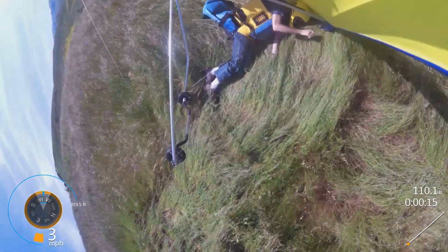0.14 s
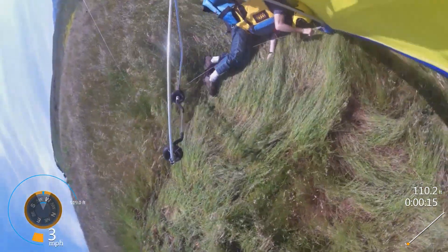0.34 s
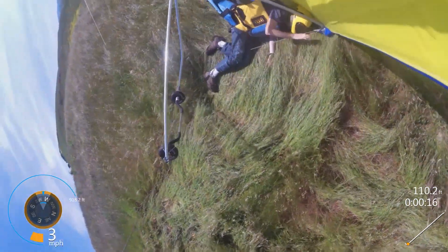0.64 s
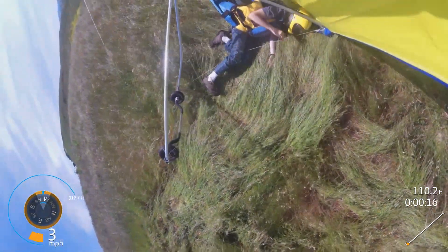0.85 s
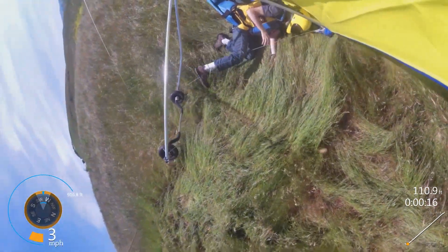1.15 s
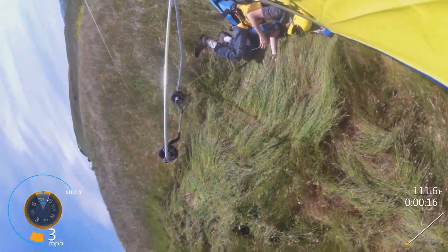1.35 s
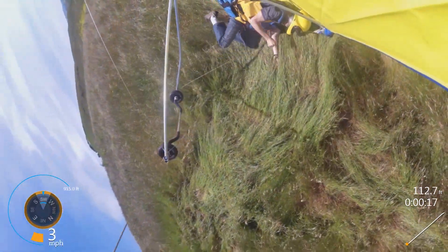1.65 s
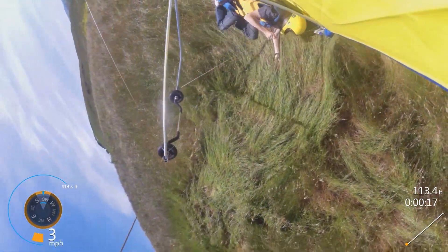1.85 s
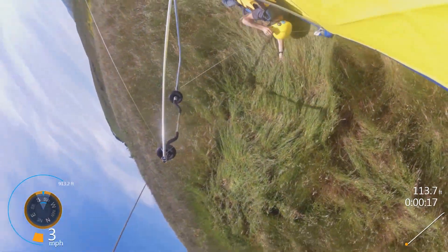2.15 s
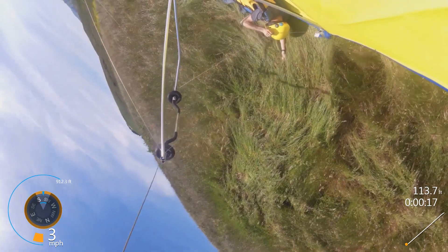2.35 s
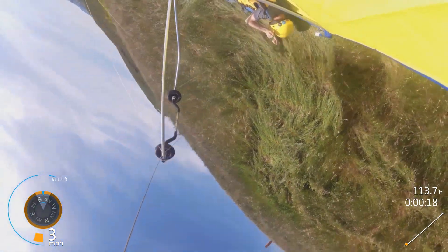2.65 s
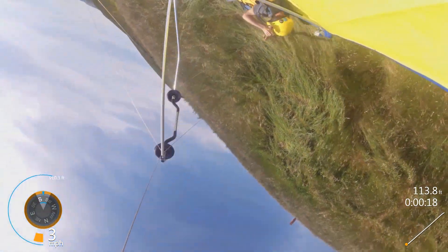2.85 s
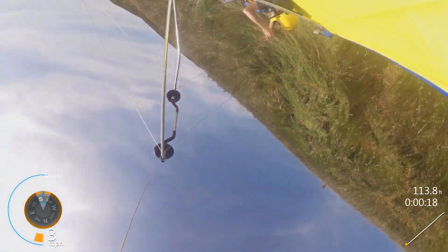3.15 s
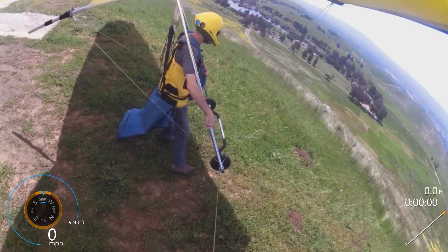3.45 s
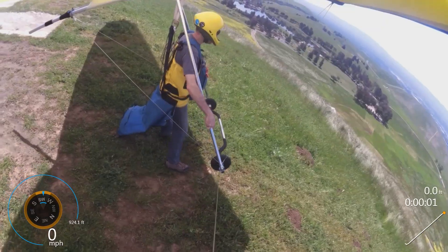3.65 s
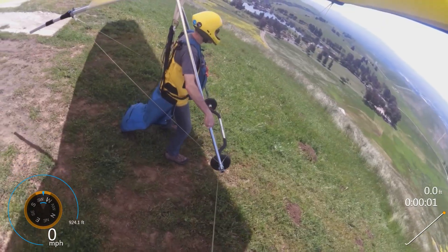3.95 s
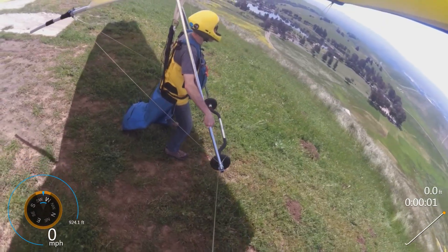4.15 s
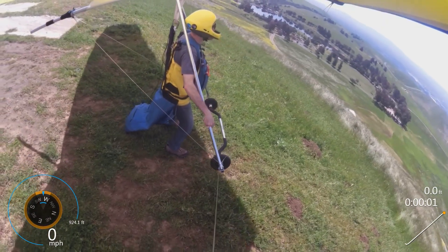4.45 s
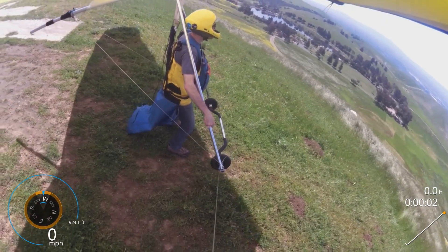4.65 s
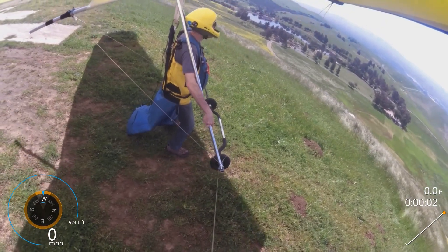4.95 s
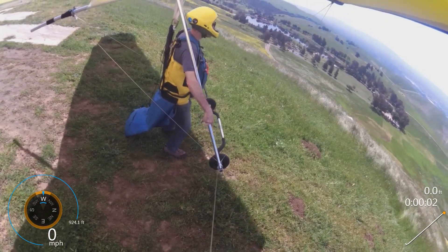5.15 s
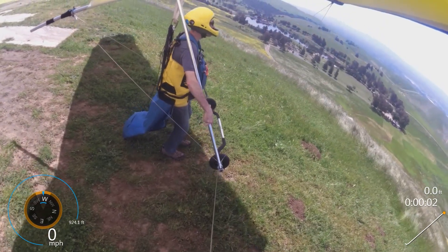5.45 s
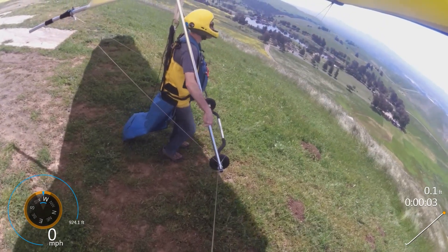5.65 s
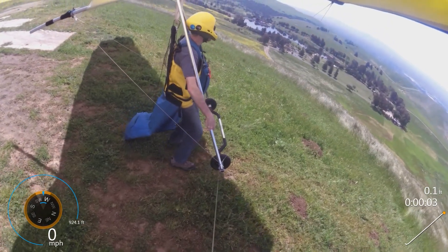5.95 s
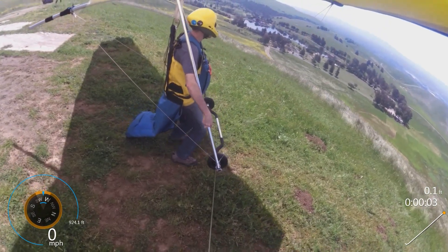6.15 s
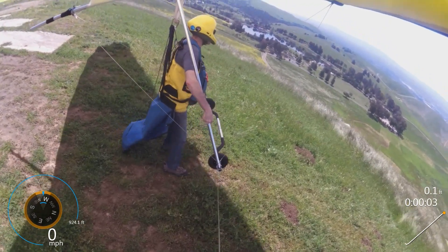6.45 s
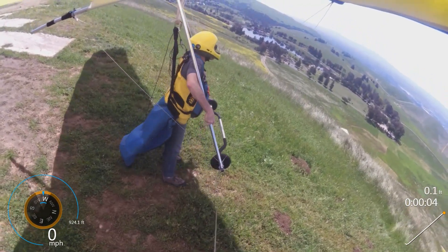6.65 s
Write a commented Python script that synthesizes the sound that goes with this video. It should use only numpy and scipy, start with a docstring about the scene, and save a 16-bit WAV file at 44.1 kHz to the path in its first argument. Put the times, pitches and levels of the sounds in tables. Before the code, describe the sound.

A camera on a toppled hang glider thumps and scrapes harshly through long grass, quiets, judders, then cuts to a calm hillside ended by a metallic clank.

```python
"""A tipped-over hang glider drags its wing camera through long grass: decaying swings thump the housing, ringing
flicks snap at it, random slips scrape along it, and the microphone clips. Light wind, shaped noise, blows throughout.
Frame knocks, rubbed notes and a pattering of stems follow, then a judder before the sound jumps to the glider
standing on a quiet hillside: harness rubbing, knocks, and a faint cricket, a tone gated into chirps.
Late on, as it is lifted, a bouncing metal blow sets the tube modes ringing in one clank."""
import sys
import numpy as np
from scipy import signal
from scipy.fft import rfft, irfft
from scipy.io import wavfile

SR = 44100
rng = np.random.default_rng(int(sys.argv[2]) if len(sys.argv) > 2 else 0)


def dump(signal):
    """Clip the signal to [-1, 1] and save it as 16-bit WAV at the path in sys.argv[1]."""
    limited = np.clip(np.atleast_2d(signal).T, -1, 1)
    pcm = np.round(limited * 32767).astype(np.int16)
    wavfile.write(sys.argv[1], SR, pcm)


N = 300040
TIME = np.arange(N) / SR


def amp(db):
    """Logarithmic level: decibels to amplitude gain."""
    return 10 ** (np.asarray(db) / 20)


def evened(x):
    """Power normalisation: scales to unit mean square."""
    return x / np.sqrt(np.mean(x ** 2) + 1e-20)


def peaked(x):
    """Peak normalisation: scales to unit peak."""
    return x / (abs(x).max() + 1e-20)


def add(mix, s, sound):
    """Superposition: adds a sound into the mix, in place, at time s."""
    part = mix[max(round(s * SR), 0):][:len(sound)]
    part += sound[:len(part)]


def colour(x, points, size=4096):
    """Minimum-phase filtering: the Hilbert transform of the log gain gives a causal response."""
    hz, db = np.transpose(points)
    bin_hz = abs(np.fft.fftfreq(size, 1 / SR))
    gain_db = np.interp(np.log(bin_hz + 1), np.log(hz), db)
    spectrum = np.exp(np.conj(signal.hilbert(np.log(amp(gain_db)))))
    response = np.fft.ifft(spectrum).real
    return signal.fftconvolve(x, response[:size // 2])[:len(x)]


def hiss(points, size):
    """Spectral shaping: white noise coloured and set to unit power."""
    return evened(colour(rng.standard_normal(size), points))


def wander(rate_hz):
    """Band-limited random fluctuation: low-passed noise of unit spread."""
    lowpass = 1 / (1 + (np.fft.rfftfreq(N, 1 / SR) / rate_hz) ** 4)
    return evened(irfft(rfft(rng.standard_normal(N)) * lowpass, N))


def fade(t, t60):
    """Exponential damping: falls by 60 dB in t60 seconds."""
    return np.exp(-np.log(1000) * t / max(t60, 1e-3))


def ring(modes, t, spread_db):
    """Modal superposition: a random striking point gives each damped mode its own share and sign."""
    total = 0
    for hz, db, t60 in modes:
        share = rng.choice([-1, 1]) * amp(db + spread_db * rng.standard_normal())
        total = total + share * fade(t, t60) * np.sin(2 * np.pi * hz * t)
    return total


def grains(grains_per_s, grain_db):
    """Random impulse train: sparse grains of either sign and uneven strength, capped at 4 * grain_db."""
    sizes = rng.choice([-1, 1], N) * amp(grain_db * np.minimum(rng.exponential(1, N), 4))
    return (rng.random(N) < grains_per_s / SR) * sizes


# heavy blows on the housing: [t/s, relative level/dB, nominal f/Hz]
BLOWS = [(0.0, 2.5, 88), (.028, 9, 164.8), (.037, 5.5, 156.5), (.088, -9, 353), (.109, -0.5, 217),
         (.188, -10.5, 366), (.207, -10.5, 210), (.3, 2.5, 139), (.437, -3.5, 242), (.45, 2, 178),
         (.473, 12, 136), (.497, 7.5, 154), (.52, -5, 196), (.549, -9.5, 460), (.585, -9, 220),
         (.605, -5.5, 215), (.627, -0.5, 216), (1.09, -19, 122), (1.605, -19, 160), (2.207, -20, 153),
         (3.252, -0.5, 420), (3.255, 3.5, 123), (3.326, 1, 168.7), (6.154, -12, 440), (6.17, -15, 167),
         (6.267, -3.5, 432), (6.28, -0.5, 171)]
# scraping spectrum, also the crunch within a blow: [f/Hz, relative level/dB per Hz]
SCRAPE_SPECTRUM = [(100, -8.5), (300, 10), (600, 6), (1000, 4), (1500, -2), (1900, -12.5), (2230, -4.5),
                   (2600, -16), (3300, -25), (4900, -30.5), (7000, -44.5)]
SWELL_CYCLES = 0.48  # rise of a blow, in cycles of its nominal frequency


def thumps(rows, sag=0.45, crunch_db=-24, level_db=-1, size=6000):
    """Falling contact stiffness: each shove makes a few heavy swings that slow as the contact loosens."""
    out, t = np.zeros(N), np.arange(size) / SR
    for s, db, hz in rows:
        u = t * hz / SWELL_CYCLES
        push = (u * np.exp(1 - u)) ** 2
        pitch = hz * (1 + sag * (2 * np.exp(-u / 2) - 1))
        swing = np.sin(2 * np.pi * np.cumsum(pitch) / SR)
        crunch = amp(crunch_db) * hiss(SCRAPE_SPECTRUM, size)
        add(out, s, amp(db + level_db) * push * (swing + crunch))
    return out


# stems crushed under a blow: [f/Hz, relative level/dB per Hz]
CRUSH_SPECTRUM = [(200, -15), (900, 5.5), (2300, -5.5), (4500, -25), (7000, -25), (14000, -25.5)]


def crush(shoves, level_db=-21, follow_hz=60, give=1.0, grains_per_s=2500, grain_db=4):
    """Force-modulated crackle: stems crackle as hard as the blows press, up to where they give way."""
    pressed = np.minimum(abs(shoves), give)
    force = signal.lfilter(*signal.butter(1, follow_hz, fs=SR), pressed)
    crackle = evened(colour(grains(grains_per_s, grain_db), CRUSH_SPECTRUM))
    return amp(level_db) * force * crackle


# bass of the rubbing: [f/Hz, relative level/dB per Hz]
WEIGHT_SPECTRUM = [(20, -31), (45, -15.5), (75, -2.5), (120, -5), (170, 3), (230, -2), (300, -9),
                   (500, -11.5), (900, -22), (2000, -64)]
# low modes of the frame, rung by rubs and knocks: [f/Hz, relative level/dB, T60/s]
FRAME_MODES = [(155.8, -5, 0.21), (211.8, -2, 0.14), (217.4, -1.5, 0.12), (254.6, -0.5, 0.088),
               (323.4, -1.5, 0.11), (410, -6, 0.13), (468, -7, 0.066), (625, -10, 0.094)]
# modes of the camera's housing and mount, rung likewise: [f/Hz, relative level/dB, T60/s]
CASE_MODES = [(851, 3.5, 0.21), (1206, 5.5, 0.033), (1236, -14.5, 0.089), (1480, -1, 0.14),
              (1596, -2.5, 0.066), (1704, -2.5, 0.05), (2118, -3.5, 0.11), (2228, 3, 0.045),
              (2670, -13, .03), (3420, -13, 0.011), (4320, -16.5, 0.05), (4850, -22, 0.025)]


def rubbing(curve, weight_db, scrape_db, grains_per_s, grain_db, lumpy_db, ring_db, case_db, size=9000):
    """Frictional excitation: countless tiny slips, in clumps, set the frame and the housing ringing."""
    s, weight, scrape = np.transpose(curve)
    t = np.arange(size) / SR
    clumps = amp(lumpy_db * wander(rate_hz=14))
    slips = evened(grains(grains_per_s, grain_db) * clumps)
    frame = evened(signal.fftconvolve(slips, ring(FRAME_MODES, t, spread_db=2.5))[:N])
    case = evened(signal.fftconvolve(slips, ring(CASE_MODES, t, spread_db=2.5))[:N])
    bass = evened(colour(slips + rng.standard_normal(N), WEIGHT_SPECTRUM))
    low = evened(bass + amp(ring_db) * frame)
    high = evened(colour(slips, SCRAPE_SPECTRUM)) + amp(case_db) * case
    low_gain = amp(np.interp(TIME, s, weight) + weight_db)
    high_gain = amp(np.interp(TIME, s, scrape) + scrape_db)
    return low_gain * low + high_gain * high


# rubbing of grass: [t/s, relative bass level/dB, relative treble level/dB]
DRAG_LEVELS = [(0.0, -25.5, -39.5), (.23, -27.5, -36), (.5, -22, -39.5), (.62, -31, -52.5),
               (.85, -35.5, -54), (1.44, -44, -58.5), (1.85, -41.5, -55.5), (2.25, -32.5, -42),
               (2.45, -35.5, -48), (2.7, -37.5, -50), (2.8, -29, -46), (2.94, -26.5, -38.5),
               (3.03, -39.5, -50), (3.22, -31.5, -42), (3.35, -26.5, -46.5)]


def grass():
    """Sliding friction: grass drags along the housing."""
    return rubbing(DRAG_LEVELS, weight_db=0.0, scrape_db=2.5, grains_per_s=3500, grain_db=3,
                   lumpy_db=3.0, ring_db=-6.0, case_db=-13.5)


# light air: [f/Hz, relative level/dB per Hz]
AIR_SPECTRUM = [(25, -26.5), (70, -17), (200, -0.5), (400, -8), (650, -12.5), (1000, -10), (2000, -18),
                (3500, -23.5), (5000, -32), (8000, -23.5)]


def wind(level_db=-62):
    """Turbulence noise: light air as shaped noise under slow, slight gusts."""
    gusts_db = .7 * wander(rate_hz=4)
    return amp(level_db + gusts_db) * hiss(AIR_SPECTRUM, N)


# stiff stalks and wires flicking the housing: [t/s, peak level/dB, f/Hz]
STALK_FLICKS = [(.065, -19, 1360), (.201, -16, 990), (.294, -15.5, 1040), (.295, -21, 3900),
                (.45, -10, 1450), (.487, -16.5, 3540), (.551, -8.5, 1160), (.63, -29.5, 1335),
                (1.308, -39, 540), (1.866, -29, 605), (2.214, -35, 3600), (2.281, -30, 860),
                (3.249, -4, 3955), (3.325, -25.5, 3500), (3.739, -45, 3706), (5.635, -45, 4200),
                (6.155, -22.5, 833), (6.411, -26, 874)]
# sharp crack of a flick or a metal blow: [f/Hz, relative level/dB per Hz]
CRACK_SPECTRUM = [(60, -21), (400, 8.5), (1000, 14.5), (1600, 7.5), (3000, -6), (4800, -29), (8000, -28.5),
                  (14000, -34.5)]


def flicks(rows, ring_cycles, crack, size=4000):
    """Constant-cycle damping: a crack and a very short ring, the shorter the higher it is."""
    out, t = np.zeros(N), np.arange(size) / SR
    for s, db, hz in rows:
        t60 = ring_cycles / hz
        tone = np.sin(2 * np.pi * hz * t) * fade(t, t60)
        snap = tone + crack * hiss(CRACK_SPECTRUM, size) * fade(t, min(t60, .025))
        add(out, s, amp(db) * peaked(snap))
    return out


TUFT_S, TUFT_LENGTH_S = .45, .088
TUFT_DB, TUFT_HZ = -2, 380  # centre of the scatter


def tuft(count=4):
    """Random impact sequence: a thick tuft's quick light blows; rows of t/s, relative level/dB, f/Hz."""
    late, scatter_db, detune = (rng.uniform(-1, 1, (count, 3)) * [.3, 2, .15]).T
    s = TUFT_S + TUFT_LENGTH_S * (np.arange(count) + .5 + late) / count
    return list(zip(s, TUFT_DB + scatter_db, TUFT_HZ * (1 + detune)))


# knocks carried by the frame: [t/s, relative level/dB, relative treble level/dB]
FRAME_KNOCKS = [(.76, -22.5, -16), (1.091, -28, -20), (1.601, -28.5, -16.5), (1.756, -36, -4),
                (1.867, -24, -11.5), (1.885, -24.5, -14), (2.025, -30.5, -4.5), (2.331, -27.5, -5),
                (3.392, -35.5, -4), (3.453, -31, -11.5), (3.738, -26, -22), (3.917, -37, -14),
                (4.184, -30, -14.5), (4.206, -34, -10), (4.284, -34, -22), (4.356, -31, -8.5),
                (4.754, -37.5, -7), (4.916, -34.5, -11), (5.343, -33.5, -10.5), (5.455, -28.5, -18.5),
                (5.577, -27, -19.5), (5.634, -32, -12), (5.845, -35, -10), (6.153, -14.5, -20),
                (6.411, -17.5, -23), (6.449, -19.5, -9.5), (6.558, -24.5, -16)]
# dull body of a knock: [f/Hz, relative level/dB per Hz]
BODY_SPECTRUM = [(40, -23), (140, 1.5), (250, 10), (450, 2), (900, -12.5), (1300, -17.5), (3000, -64)]
# rattling edge of a knock: [f/Hz, relative level/dB per Hz]
EDGE_SPECTRUM = [(300, -26.5), (700, 8.5), (1500, 13), (1900, -10.5), (2250, -3), (2800, -6), (4800, -14.5),
                 (5600, -45.5), (12000, -67.5)]


def knocks(rows, t60, ring_db=0, edge_db=2, edge_share=0.61, case_db=2, rise_s=0.0012, level_db=-1, size=14000):
    """Structure-borne impact: the housing ticks and rattles over a low ring of the frame."""
    out, t = np.zeros(N), np.arange(size) / SR
    for s, db, treble_db in rows:
        thud = peaked(hiss(BODY_SPECTRUM, size) * fade(t, t60))
        frame = peaked(ring(FRAME_MODES, t, spread_db=0.5))
        body = peaked((thud + amp(ring_db) * frame) * (1 - np.exp(-t / rise_s)))
        rattle = peaked(hiss(EDGE_SPECTRUM, size) * fade(t, t60 * edge_share))
        case = peaked(ring(CASE_MODES, t, spread_db=2))
        edge = peaked(rattle + amp(case_db) * case)
        add(out, s, amp(db + level_db) * peaked(body + amp(treble_db + edge_db) * edge))
    return out


# notes drawn out by stick-slip: [t/s, relative level/dB, f/Hz, length/s]
GROAN_NOTES = [(1.89, -31.5, 162, 0.49), (2.14, -36, 625, 0.1), (2.987, -24.5, 190, .09),
               (4.173, -33.5, 253, 0.073)]


def groans(waver=0.0351, shudder_db=3, level_db=-2):
    """Stick-slip oscillation: brief unsteady notes of a rubbed tube or wire."""
    out = np.zeros(N)
    speed = 1 + waver * wander(rate_hz=35.8)
    grip = amp(shudder_db * wander(rate_hz=32))
    for s, db, hz, length in GROAN_NOTES:
        swell = np.sin(np.pi * np.clip((TIME - s) / length, 0, 1))
        note = np.sin(2 * np.pi * np.cumsum(hz * speed) / SR)
        out += amp(db + level_db) * swell * grip * note
    return out


# onsets of the pattering stems: [t/s]
PATTER_ONSETS = [2.333, 2.357, 2.376, 2.414, 2.495, 2.545, 2.572]


def patter(level_db=-36, hz=2173):
    """Repeated impact: stems flick the housing at one level and pitch."""
    return flicks([(s, level_db, hz) for s in PATTER_ONSETS], ring_cycles=110, crack=0.97)


# catches of the frame juddering over the ground: [t/s]
JUDDER_ONSETS = [3.017, 3.04, 3.068, 3.095, 3.139, 3.18]


def judder(knock_db=-20, treble_db=-18.5, flick_db=-32, flick_hz=617, rise_db_per_s=37):
    """Intermittent contact: each catch is a ground-damped knock and a flick, sharper as it goes."""
    catches = [(s, rise_db_per_s * (s - JUDDER_ONSETS[0])) for s in JUDDER_ONSETS]
    dull = knocks([(s, knock_db, treble_db + rise) for s, rise in catches], t60=.11)
    sharp = flicks([(s, flick_db + rise, flick_hz) for s, rise in catches], ring_cycles=40, crack=1.2)
    return dull + sharp


# rubbing on the standing frame: [t/s, relative bass level/dB, relative treble level/dB]
STAND_LEVELS = [(3.37, -40, -54), (3.6, -45.5, -62), (4.27, -44, -74), (4.55, -56.5, -65.5),
                (5.09, -37.5, -52.5), (5.57, -42, -56), (6.2, -36, -52), (6.33, -22, -42),
                (6.46, -29, -37.5), (6.6, -30.5, -48), (6.8, -31, -49)]


def harness():
    """Sliding friction: the harness rubs on the standing frame."""
    return rubbing(STAND_LEVELS, weight_db=-7.5, scrape_db=-2.5, grains_per_s=3000, grain_db=2.5,
                   lumpy_db=4.0, ring_db=1.5, case_db=-12.5)


CRICKET_S, CHIRP_EVERY_S, CHIRP_LENGTH_S = 3.775, .215, .063


def cricket(level_db=-80, hz=4950, strokes_per_s=85):
    """Amplitude modulation: evenly paced chirps of a few wing strokes, wavering on the breeze."""
    u = (TIME - CRICKET_S) % CHIRP_EVERY_S / CHIRP_LENGTH_S
    chirps = np.sqrt(np.clip(4 * u * (1 - u), 0, 1)) * (TIME > CRICKET_S)
    strokes = 2 * np.sin(np.pi * strokes_per_s * TIME) ** 2
    breeze = amp(2 * wander(rate_hz=20))
    pitch = hz + 45 * wander(rate_hz=60)
    return amp(level_db) * chirps * strokes * breeze * np.sin(2 * np.pi * np.cumsum(pitch) / SR)


# blows of a fitting against the tubes: [t/s, relative level/dB]
CLANK_BLOWS = [(6.264, -0.5), (6.269, 3.5), (6.276, -36)]
# modes of the tubes; close groups beat: [f/Hz, relative level/dB, T60/s]
TUBE_MODES = [(323, 2, .22), (420, 3, .05), (670, 3, .06), (868, -7, .25), (888, -4, .33), (914, -2, .25),
              (1147, -6, .14), (1244, -16, .17), (1362, 3, .05), (1505, 3, .05), (1815, -3, .05),
              (2034, -6, .05), (2422, -22, .3), (2498, -14, .22), (2560, -17, .16), (2613, -14, .13),
              (3130, -11, .055), (4156, -34, .22), (4640, -27, .18), (4700, -27, .21), (4785, -24, .14)]


def clank(ring_db=-16.5, crack_db=-13, crack_t60=0.072, size=26000):
    """Impact and modal decay: metal bounces on metal; the hardest blow leaves the aluminium tubes ringing."""
    out, t = np.zeros(N), np.arange(size) / SR
    for s, db in CLANK_BLOWS:
        add(out, s, amp(db + crack_db) * hiss(CRACK_SPECTRUM, size) * fade(t, crack_t60))
    hardest_s = max(CLANK_BLOWS, key=lambda row: row[1])[0]
    add(out, hardest_s, amp(ring_db) * ring(TUBE_MODES, t, spread_db=0))
    return out


JUMP_S = 3.358  # the dragging gives way to the quiet hillside


def scene():
    """Superposition of sources: grass rubs and crackles until the jump, the harness rubs after it."""
    shoves = thumps(BLOWS + tuft())
    contact = np.where(TIME < JUMP_S, grass() + crush(shoves), harness())
    bed = contact + wind() + cricket() + groans()
    stalks = flicks(STALK_FLICKS, ring_cycles=18, crack=0.98)
    frame = knocks(FRAME_KNOCKS, t60=0.21) + judder() + clank()
    return (bed + shoves + stalks + patter() + frame)[None]


# passage through the housing: [f/Hz, gain/dB]
HOUSING_GAIN = [(5000, 1.5), (5900, -4.5), (9000, -21), (16000, -23)]
# microphone self-noise: [f/Hz, relative level/dB per Hz]
HISS_SPECTRUM = [(100, -4), (6000, 0), (9000, -4), (12000, -11), (15000, -23)]


def record(dry, hiss_db=-90, limit=.7, edge_hz=15900):
    """Transmission loss and overload: the housing dulls the treble; the faintly hissing microphone clips."""
    heard = colour(dry[0], HOUSING_GAIN) + amp(hiss_db) * hiss(HISS_SPECTRUM, N)
    clipped = np.clip(heard, -limit, limit)
    lowpass = signal.firwin(511, edge_hz, window=("kaiser", 9), fs=SR)
    return signal.oaconvolve(clipped, lowpass, "same")[None]


dry = scene()
out = record(dry)
dump(out)
```